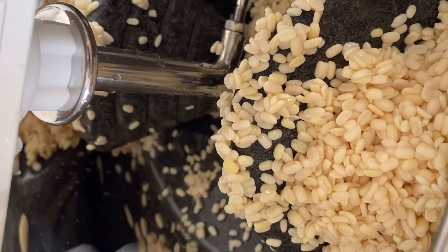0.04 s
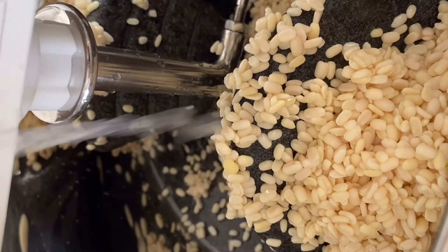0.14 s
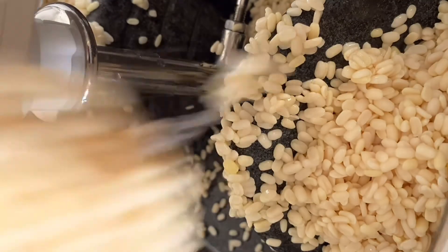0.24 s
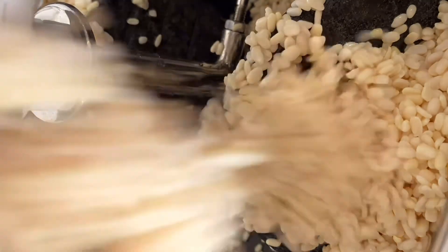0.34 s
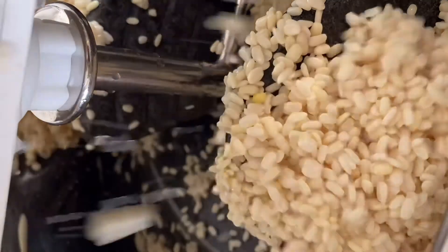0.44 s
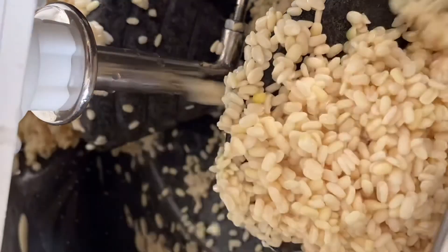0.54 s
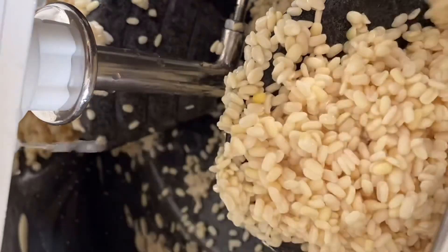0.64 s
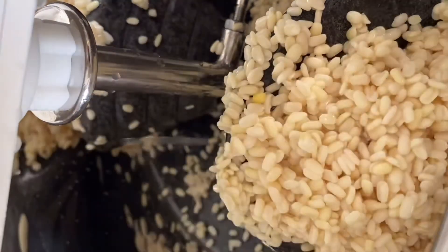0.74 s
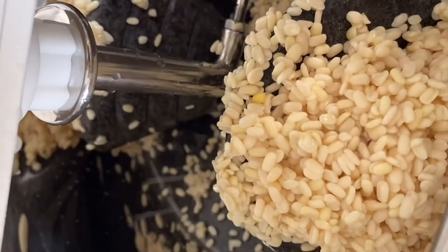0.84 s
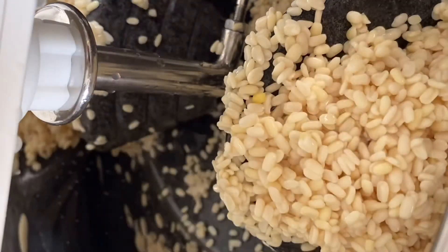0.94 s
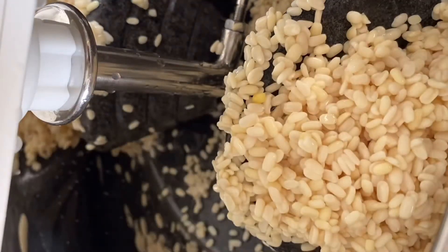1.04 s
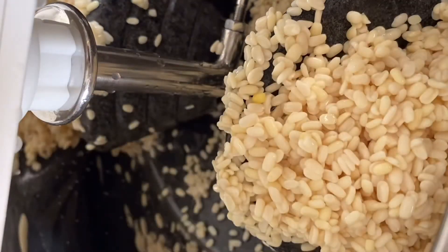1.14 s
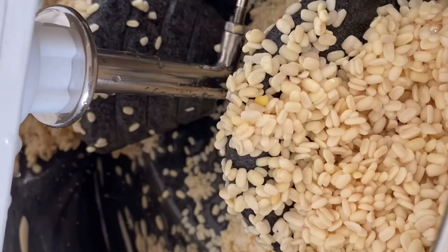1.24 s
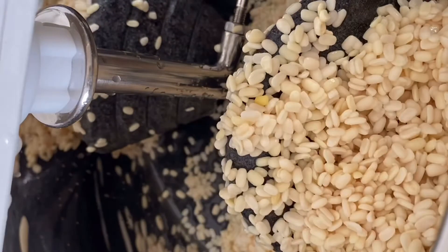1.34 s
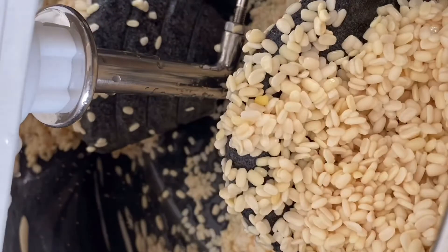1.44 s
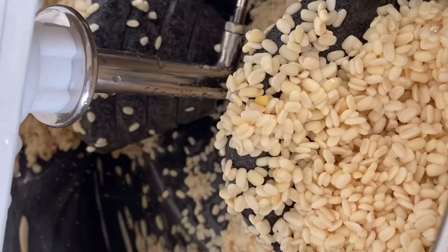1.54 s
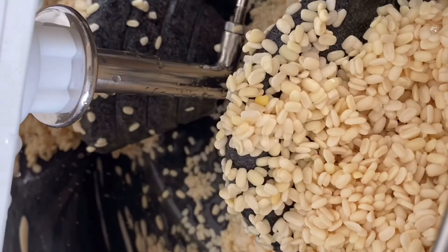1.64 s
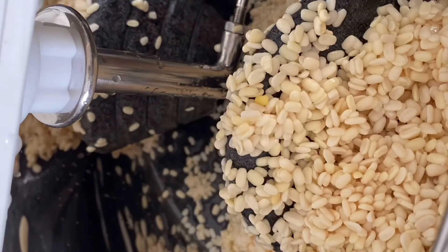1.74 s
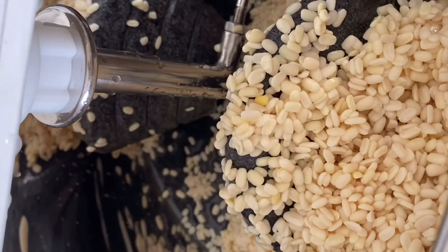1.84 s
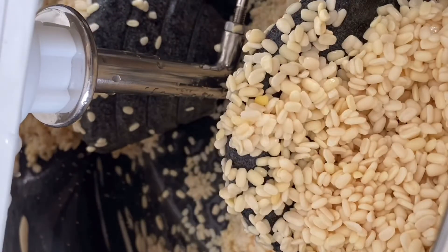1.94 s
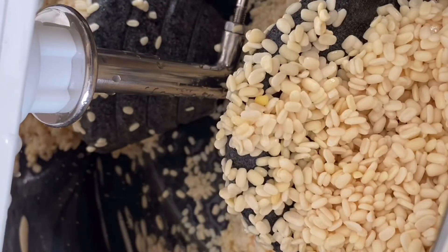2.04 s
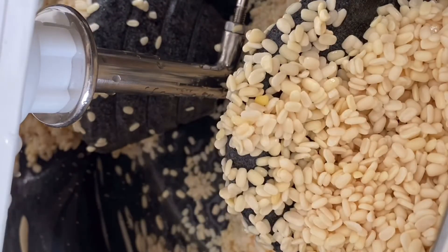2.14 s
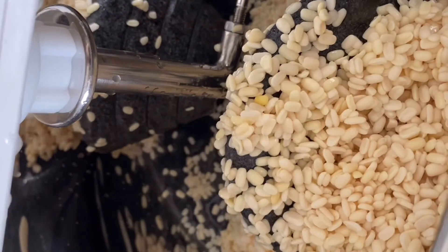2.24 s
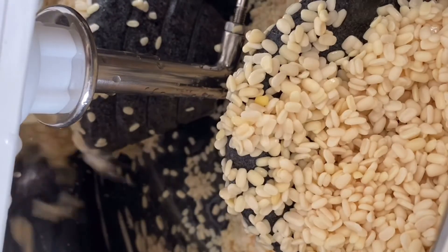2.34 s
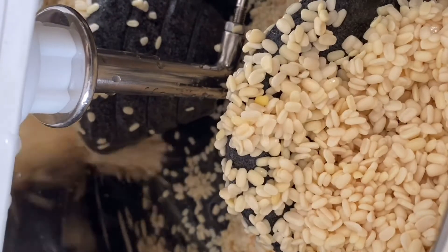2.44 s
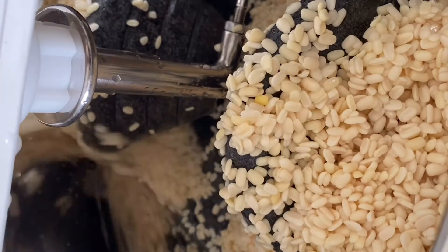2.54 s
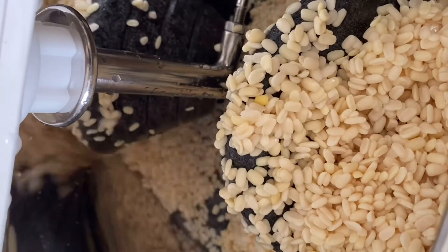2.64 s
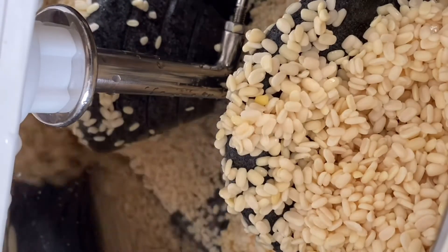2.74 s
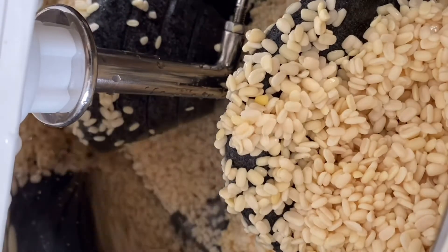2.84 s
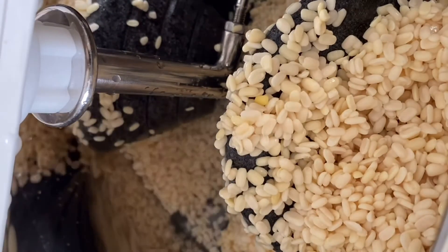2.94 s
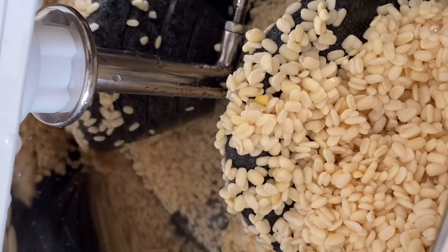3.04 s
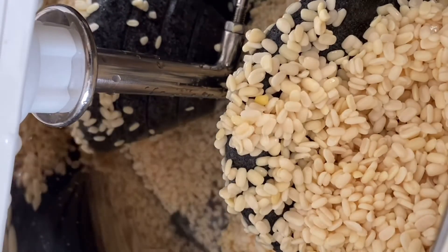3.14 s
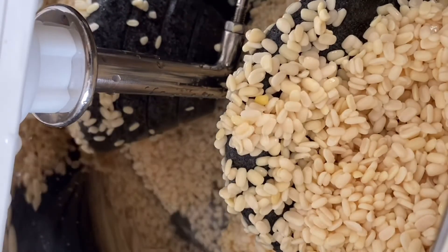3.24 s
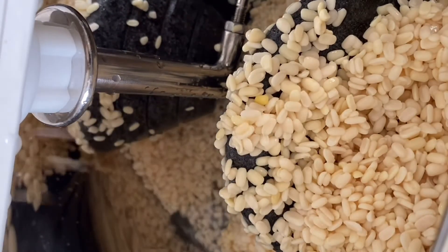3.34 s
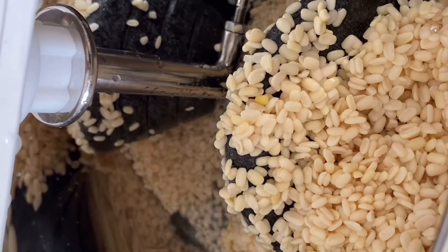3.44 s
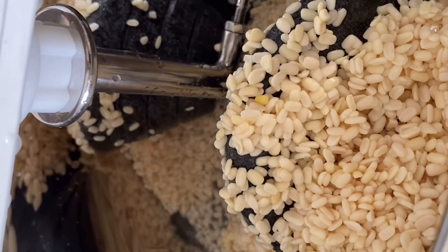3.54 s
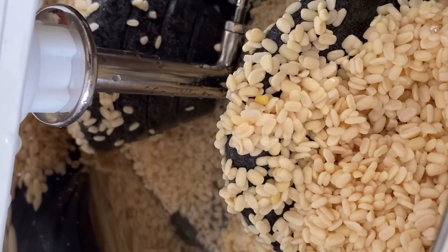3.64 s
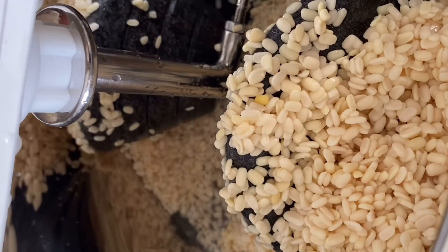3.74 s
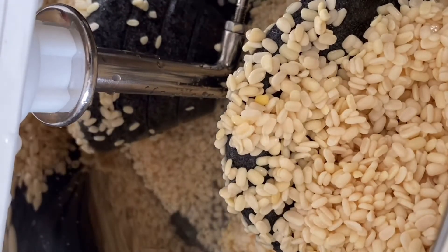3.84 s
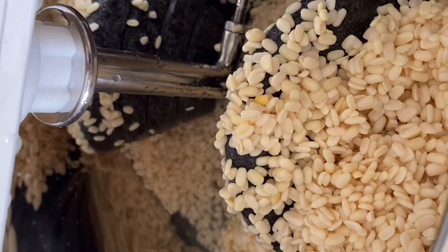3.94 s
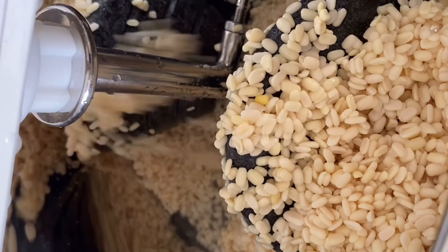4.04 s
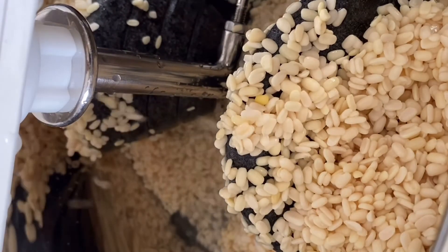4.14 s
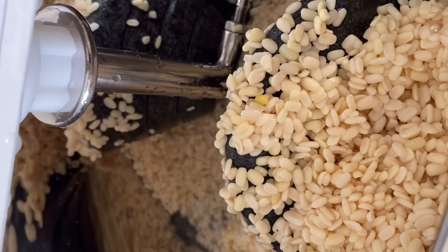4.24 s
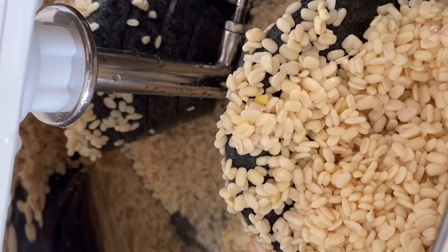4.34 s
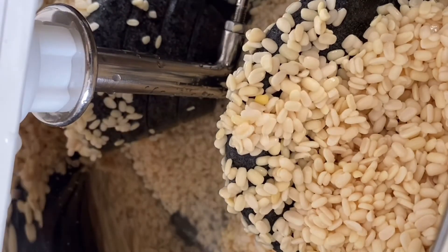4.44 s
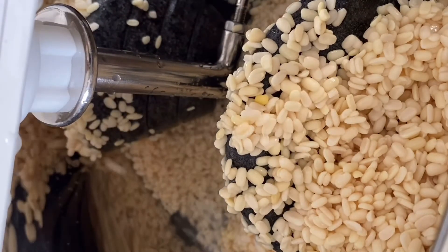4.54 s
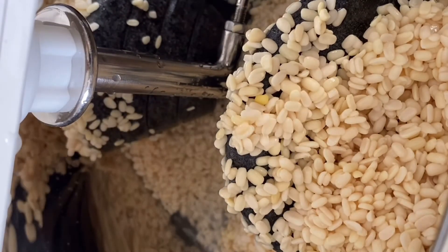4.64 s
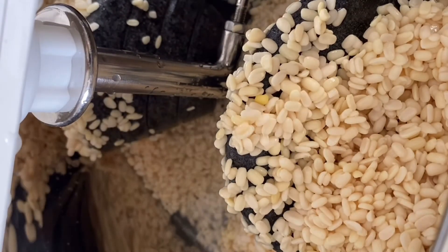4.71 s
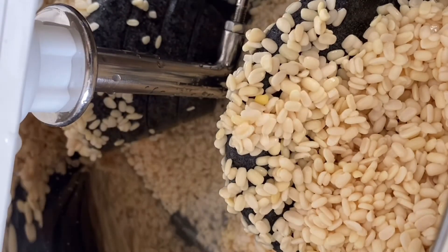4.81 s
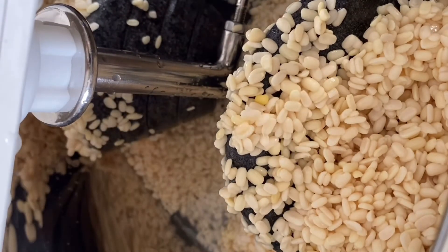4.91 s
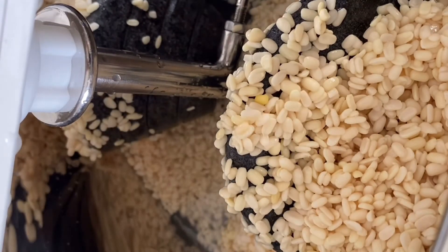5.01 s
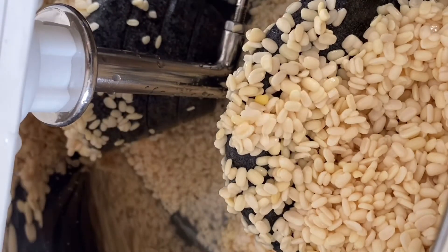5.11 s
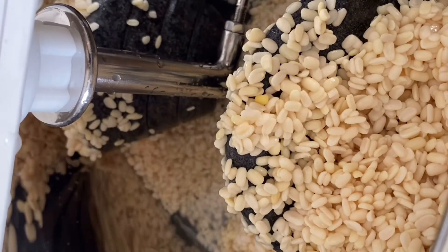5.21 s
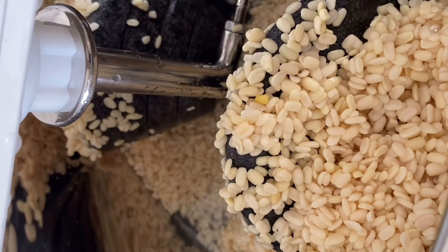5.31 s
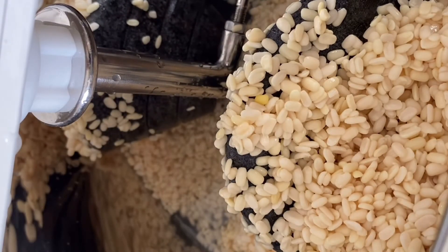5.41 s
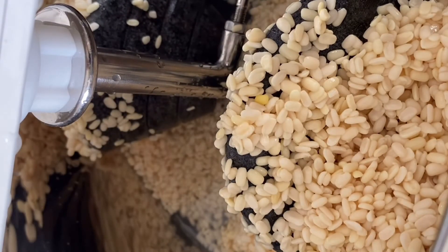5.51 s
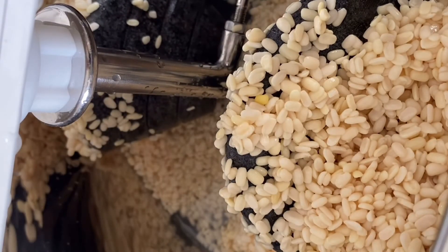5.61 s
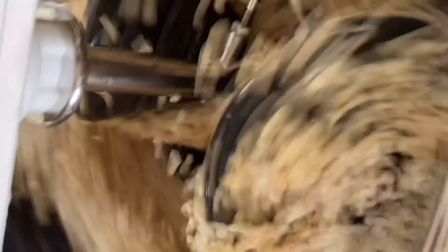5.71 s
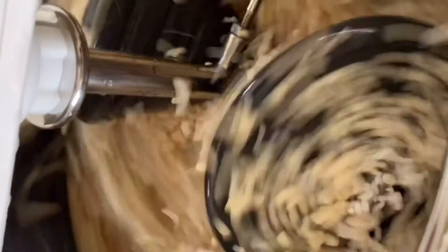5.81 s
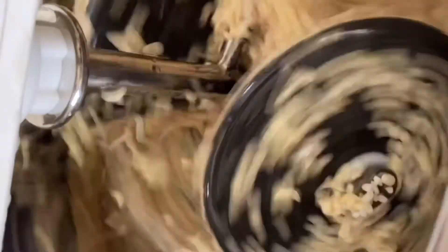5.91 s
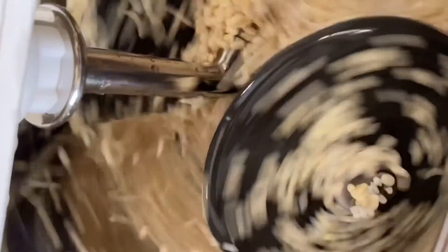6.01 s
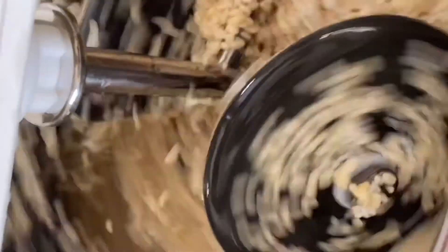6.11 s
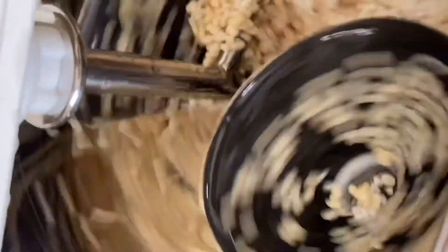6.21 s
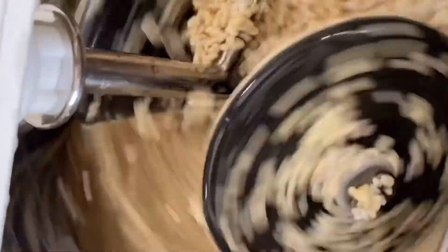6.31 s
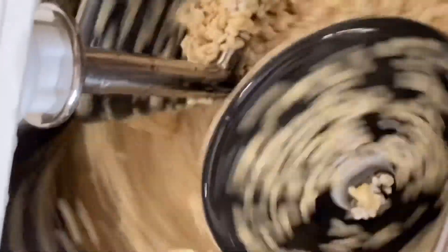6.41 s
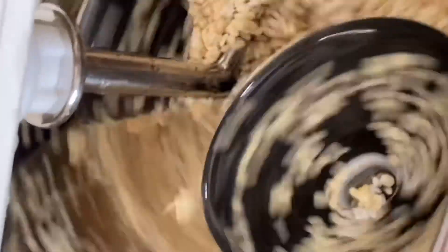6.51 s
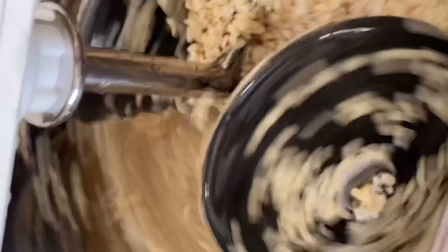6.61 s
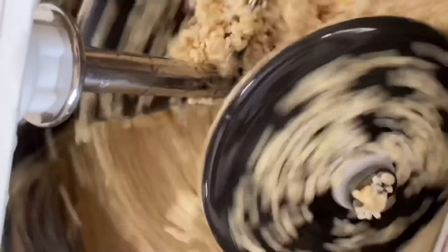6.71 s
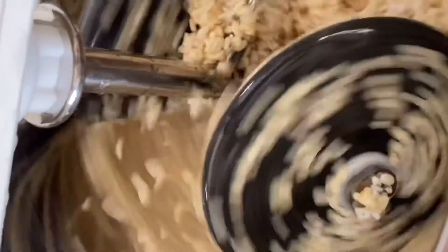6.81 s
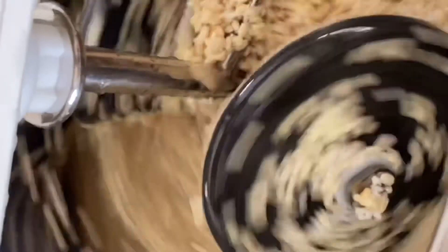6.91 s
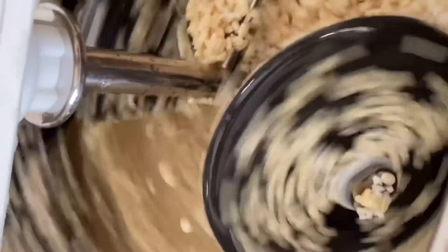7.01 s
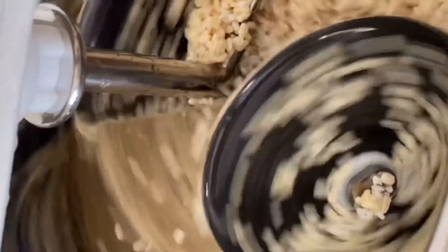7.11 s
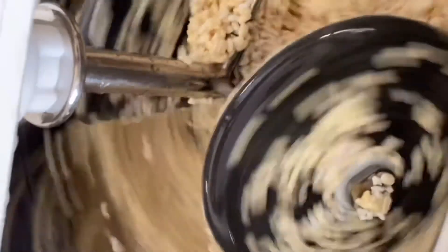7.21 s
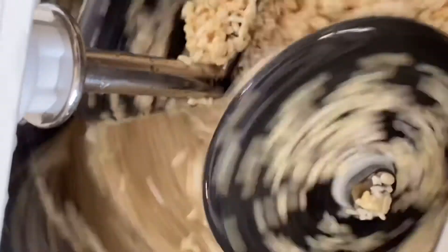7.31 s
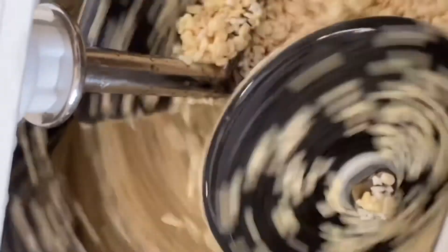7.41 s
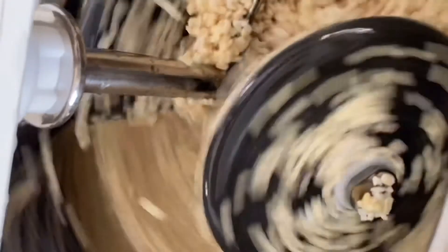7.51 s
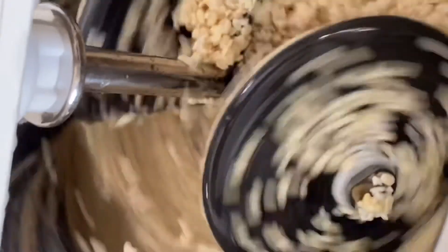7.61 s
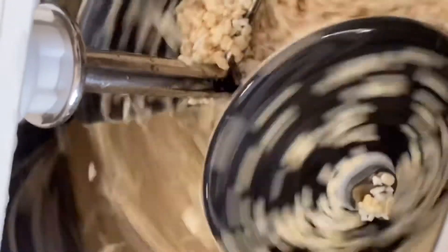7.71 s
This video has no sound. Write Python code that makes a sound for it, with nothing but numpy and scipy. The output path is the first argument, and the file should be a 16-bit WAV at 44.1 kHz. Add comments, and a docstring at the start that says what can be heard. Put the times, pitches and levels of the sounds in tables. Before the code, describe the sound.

Close up, small hard grains rattle briefly, then near silence with faint room tone. A steel bowl bangs and booms, drip-like blips sound, and wet grains are scraped and shaken out in uneven spurts, strongest about two thirds through the pouring. Then the machine is suddenly running: a clunk, a bright gritty onset, and continuous rumbling, crunching noise in a small indoor room.

```python
"""In a quiet kitchen wet lentils are tipped and scraped from a steel bowl into the drum of a stone grinder.
Grains are random clicks that ring damped modes, under a film of hissing noise; contacts set off ringing
modes, some as short drip-like blips, and the hollow bowl booms when knocked. Two cuts each fade briefly
down and up; the second goes to the grinder running: a hollow clunk of its drum, then dense crushing noise
through drum resonances, over motor tones."""
import sys
import numpy as np
from scipy import signal
from scipy.fft import rfft, irfft
from scipy.io import wavfile
from scipy.ndimage import uniform_filter1d

SR = 44100
rng = np.random.default_rng(int(sys.argv[2]) if len(sys.argv) > 2 else 0)


def unload_audio(sound):
    """Save the sound as a 16-bit wav file, at the path given as the first command line argument."""
    columns = np.transpose(np.atleast_2d(sound))
    # keep every value between -1 and 1, then stretch to whole-number steps
    steps = np.round(np.clip(columns, -1, 1) * 32767)
    wavfile.write(sys.argv[1], SR, steps.astype(np.int16))


N = 342216
TIME = np.arange(N) / SR
HZ = np.maximum(np.arange(N // 2 + 1) * SR / N, 1)

# ringing modes; 960 and 1276 Hz sound in short bubbly, drip-like blips:
# (frequency [Hz], level [dB], t60 [s])
RINGING_MODES = [(960, -6.5, 0.0415), (1178, -2, 0.167), (1276, -1, 0.054), (1599.8, -5.5, 0.263),
                 (1878, 2.5, 0.207), (2280, 0, 0.062), (2755, 0, 0.107), (4050, -6, 0.12),
                 (3444, 0.5, 0.198), (3708, -3, 0.116), (3198, -2.5, 0.313), (4830, -5.5, 0.093),
                 (5125, 0, 0.239), (5270, 3, 0.094), (5620, -11, 0.2), (5776, -5, 0.14)]
# two cuts, each a short fade down and up; the second goes to the grinder: (start [s], end [s], depth [dB])
CUTS = [(1.087, 1.087, -22), (5.605, 5.608, -38)]
GRINDER_START_S, LENTILS_END_S = CUTS[1][:2]


def amp(db):
    """Decibels to gain."""
    return 10 ** (np.asarray(db) / 20)


def unit(x):
    """Scale to rms 1."""
    return x / np.sqrt(np.mean(x ** 2) + 1e-20)


def curves(rows):
    """Columns of a table over time, one value per sample."""
    s, *columns = np.transpose(rows)
    return [np.interp(TIME, s, column) for column in columns]


def over_hz(points):
    """A table over frequency, read at every spectral bin on a log axis."""
    hz, value = np.transpose(points)
    return np.interp(np.log(HZ), np.log(hz), value)


def colour(x, db):
    """Filter by a dB value per spectral bin; rms 1."""
    return unit(irfft(rfft(x) * amp(db), N))


def drift(rate_hz):
    """Slow random wander of rms 1: noise through two equal poles at rate_hz, at 1/40 sample rate."""
    step = 40
    pole = np.exp(-2 * np.pi * rate_hz * step / SR)
    noise = rng.standard_normal(N // step + 2002)
    slow = signal.lfilter([1], [1, -2 * pole, pole * pole], noise)[2000:]
    return np.interp(np.arange(N) / step, np.arange(len(slow)), unit(slow))


def grains(per_s, spread_db, clump_db):
    """Random clicks of uneven size and either sign that come in clumps."""
    born = rng.random(N) < per_s * amp(clump_db * drift(25.0)) / SR
    size_db = spread_db * np.minimum(rng.exponential(1, N), 5)
    return born * amp(size_db) * rng.choice([-1, 1], N)


def ring(clicks, hz, t60):
    """One damped mode set going by clicks; rms 1."""
    radius, angle = amp(-60 / (t60 * SR)), 2 * np.pi * hz / SR
    poles = [1, -2 * radius * np.cos(angle), radius * radius]
    return unit(signal.lfilter([1, 0, -1], poles, clicks + 1e-18))


def add(out, s, sound):
    """Mix a short sound in at a time."""
    i = max(round(s * SR), 0)
    out[i:i + len(sound)] += sound[:N - i]


def fading(t60, rise_s):
    """Half-second time axis and envelope of a blow: quick rise, exponential decay."""
    t = np.arange(SR // 2) / SR
    rise = 1 - np.exp(-t / max(rise_s, 1e-5))
    return t, rise * amp(-60 * t / max(t60, .004))


def flow():
    """Rattle and hiss level in dB: pours, shakes and trickle add as powers."""
    # stray grains: (time [s], rattle [dB], wet hiss [dB])
    trickle = [(0, -57, -66.5), (.45, -60.5, -84.5), (1.0, -76, -67), (1.3, -71, -69), (1.9, -84.5, -89),
               (2.1, -54, -62), (2.85, -51.5, -58.5), (3.4, -55.5, -55.5), (3.47, -60, -73),
               (3.7, -57.5, -57), (4.3, -64.5, -68), (5.6, -54.5, -56)]
    # heaps sliding in, swelling and fading evenly:
    # (peak time [s], rattle [dB], wet hiss [dB], time to fall 20 dB either side [s])
    pours = [(0.263, -35, -58.5, 0.132), (.375, -43, -62, .05), (.81, -63, -76.5, 0.1956),
             (1.045, -52, -38, 0.03), (2.349, -39, -44, 0.124), (2.44, -42, -48, 0.2532),
             (3.851, -49, -58.5, 0.1981), (4.073, -58, -35, 0.0911), (4.56, -49, -52.5, 0.17),
             (5.053, -51, -43, 0.144), (5.457, -50, -38.5, 0.07), (2.959, -42, -38.5, 0.0459)]
    # grains shaken loose at a stroke, sudden then dying:
    # (start [s], rattle [dB], wet hiss [dB], time to fall 20 dB [s])
    shakes = [(0.015, -54.5, -58, 0.33), (.187, -38, -48.5, 0.1318), (0.461, -39, -74.5, 0.04),
              (1.46, -50.5, -61.5, 0.23), (1.901, -58, -77.5, 0.94), (1.998, -52.5, -40, 0.0138),
              (2.045, -40.5, -62, 0.246), (2.59, -48.5, -31.5, 0.0067), (2.677, -45, -43, 0.1233),
              (2.889, -39, -29.5, 0.221), (3.894, -33.5, -27, 0.0448), (3.992, -47.5, -33.5, 0.0347),
              (4.122, -28.5, -25.5, 0.0232), (4.145, -37.5, -28, 0.0619), (4.432, -26.5, -27, 0.0077),
              (4.889, -42.5, -48, 0.1044), (4.949, -60, -38.5, 0.2), ]
    shake_rise_s = 0.00164
    time = TIME[::16]
    power = amp(2 * np.array(curves(trickle)))[:, ::16]
    for s, *db, fall_s in pours:
        swell = amp(-40 * ((time - s) / fall_s) ** 2)
        power = power + amp(2 * np.array(db))[:, None] * swell
    for s, *db, fall_s in shakes:
        t = np.maximum(time - s, 0)
        burst = np.minimum(t / shake_rise_s, 1) ** 2 * amp(-40 * t / fall_s)
        power = power + amp(2 * np.array(db))[:, None] * burst
    return [np.interp(TIME, time, db) for db in 10 * np.log10(power)]


def lentils():
    """Each grain rings some cycles at its own pitch, others strike the damped steel; the water film hisses."""
    # relative spectra: (frequency [Hz], density [dB per Hz])
    rattle_spectrum = [(150, -41.5), (300, 1.5), (700, -13), (1280, -2), (2200, 2.5), (3400, -1.5),
                       (5300, -1), (7000, -6), (10000, -17.5), (16000, -41.5)]
    hiss_spectrum = [(3500, -24.5), (6000, -10.5), (7400, -1), (10500, -6), (13500, -9.5), (16500, -15)]
    rattle_db, hiss_db = flow()
    clicks = amp(rattle_db) * grains(3500.0, 2.4, 3.2)
    pitch_index = rng.integers(0, 22, N)
    loose = np.zeros(N)
    for k, hz in enumerate(np.geomspace(300, 9000, 22)):
        own_clicks = clicks * (pitch_index == k) * amp(4 * drift(12))
        loose += ring(own_clicks, hz, 40 / hz) * np.sqrt(hz)
    wall = np.zeros(N)
    for hz, db, t60 in RINGING_MODES[3:]:
        wall += amp(db) * ring(clicks * amp(4 * drift(8)), hz, .4 * t60)  # the damped steel
    rattle = colour(loose, over_hz(rattle_spectrum)) + amp(-7) * unit(wall)
    rattle_rms = np.sqrt(np.mean(amp(2 * rattle_db)))
    film = amp(3.59 * drift(50.0)) * unit(grains(5000.0, 1.54, 2.8))  # short bursts with gaps
    snaps = .35 * unit(grains(150, 2.5, 4))
    hiss = amp(hiss_db + 6) * colour(film + snaps, over_hz(hiss_spectrum))
    return (unit(rattle) * rattle_rms + hiss) * (TIME < LENTILS_END_S)


def ticks():
    """Sharp ticks of grains and spoon: a burst of noise round a pitch over a broad crack."""
    # (time [s], level before a 5 dB cut [dB], pitch [Hz], t60 [s])
    tick_rows = [(0.0159, -29.5, 4130, 0.068), (0.1182, -26.5, 3350, 0.0205), (.16, -35.5, 2800, 0.0193),
                 (0.1902, -20.5, 2380, 0.0372), (.257, -23, 3580, 0.0575), (0.303, -27, 4330, 0.034),
                 (.324, -27, 5000, 0.037), (0.537, -34.5, 4590, 0.0253), (1.4562, -44, 1350, 0.068),
                 (1.9022, -39, 1530, 0.071), (2.047, -8, 1116, 0.044), (2.318, -22.5, 6600, 0.025),
                 (2.3403, -20.5, 5370, 0.0186), (2.352, -19, 5130, 0.017), (2.4, -24.5, 2070, 0.0225),
                 (2.4239, -26, 4220, 0.0212), (2.548, -30, 5660, 0.0288), (2.592, -21, 8640, 0.039),
                 (2.6762, -24, 3810, 0.0168), (2.8912, -20, 10500, 0.021), (3.1023, -25.5, 3780, 0.018),
                 (3.194, -27.5, 9460, 0.0225), (3.223, -29, 8800, 0.0343), (3.272, -33, 3430, 0.03),
                 (3.313, -28.5, 10000, 0.0205), (3.354, -31, 9000, 0.028), (3.451, -34, 5500, 0.0137),
                 (3.5, -34, 9200, 0.0396), (3.605, -24.5, 4690, 0.0268), (3.637, -24, 9600, 0.056),
                 (3.826, -25.5, 8840, 0.034), (3.897, -13.5, 4650, 0.0238), (3.9921, -21.5, 9050, 0.0286),
                 (4.059, -17.5, 9300, 0.026), (4.121, -14.5, 1740, 0.021), (4.1489, -13.5, 4960, 0.024),
                 (4.341, -33, 10100, 0.041), (4.4039, -27.5, 2840, 0.061), (4.4333, -15, 8700, 0.0243),
                 (4.5153, -22.5, 8940, 0.0143), (4.5506, -24, 9460, 0.021), (4.562, -34, 2280, 0.042),
                 (4.825, -40, 3640, 0.026), (4.864, -36, 2180, 0.031), (4.9502, -23, 8800, 0.0356),
                 (5.061, -27.5, 5300, 0.026), (5.219, -25.5, 9260, 0.0513), (5.317, -23.5, 1840, 0.0117),
                 (5.4316, -21, 9400, 0.025), (5.459, -29, 3620, 0.036)]
    out = np.zeros(N)
    for s, db, hz, t60 in tick_rows:
        env = fading(t60, 0.000237)[1][:SR // 10]
        noise = rng.standard_normal(len(env))
        band_filter = signal.butter(1, [hz / 1.115, hz * 1.228], "band", fs=SR, output="sos")
        band = signal.sosfilt(band_filter, noise)
        add(out, s, amp(db - 5) * env * (unit(band) + 0.21 * noise))
    return out


def rings_and_blips():
    """Each event excites mode clusters unevenly, which then die; modes far from its pitch are weak."""
    # steel rings favouring modes near one pitch; those at 2.368 and 2.434 s are bubbly, drip-like blips:
    # (time [s], level [dB], favoured pitch [Hz], rattling time [s], loss away from it [dB per octave])
    events = [(.324, -47, 4830, 0.04, 60), (1.133, -59, 4600, 0.063, 16), (2.001, -49, 4840, 0.0077, 42),
              (2.288, -47, 2240, 0.117, 19.5), (2.368, -28.5, 1276, 0.0036, 90),
              (2.434, -28.5, 960, 0.0038, 76), (2.62, -43, 2280, 0.0082, 41.5),
              (2.893, -38, 3360, 0.0746, 2.5), (3.0, -44.5, 3444, 0.044, 90.5),
              (3.897, -30, 3658, 0.0098, 104.5), (4.147, -35, 4490, 0.015, 5),
              (4.168, -40.5, 3198, 0.014, 13.5), (4.436, -45.5, 2230, 0.01, 10.5),
              (4.565, -55, 1879, 0.033, 30.5), (4.891, -48, 2100, 0.033, 19),
              (5.121, -52.5, 1890, 0.096, 38.5), (5.315, -46.5, 1850, 0.036, 43),
              (5.501, -54, 1879, 0.027, 42.5)]
    split_share, spot_db = .022, 4  # spread of a cluster; its strength differs by event
    rough_rad = 0.04  # random phase step per sample while rattling, scaled by loose
    out = np.zeros(N)
    shake_db = [2.86 * drift(30.0) for mode in RINGING_MODES]
    t = np.arange(SR // 3) / SR
    for s, db, favoured_hz, rattling_s, loss_db in events:
        i = round(s * SR)
        loose = 1 / (1 + loss_db / 10)  # a choosy event rings cleaner
        for (hz, mode_db, t60), uneven_db in zip(RINGING_MODES, shake_db):
            near_db = -loss_db * abs(np.log2(hz / favoured_hz))
            if near_db < -30:
                continue
            apart, spot = rng.standard_normal((2, 2, 1))
            decay = amp(-60 * np.maximum(t - rattling_s, 0) / t60)
            env = (1 - np.exp(-t / 0.00087)) * decay * amp(loose * uneven_db[i:i + len(t)])
            slip_rad = np.cumsum(rng.standard_normal(len(t)) * (t < rattling_s)) * rough_rad * loose
            main = np.sin(2 * np.pi * hz * t + slip_rad)
            beside_hz = hz * (1 + split_share * apart)
            beside_gain = amp(spot_db * (spot - 1.5) - loss_db / 5)
            beside = beside_gain * np.sin(2 * np.pi * beside_hz * t - slip_rad)
            add(out, s, amp(db + mode_db + near_db) * env * (main + beside.sum(axis=0)))
    return out


def hollow_knocks():
    """Knocks of bowl, and last of drum, swell, wobble and die over a dull puff; the handled bowl hums."""
    # soft knocks in the bowl, stilled by the hand, some quickly and some slowly; the last is a hollow clunk of
    # the drum: # (time [s], level [dB], time until 60 dB down, sign ignored [s])
    knocks = [(0.191, -40, 0.19), (2.046, -10.5, 0.08), (2.696, -29.5, 0.26), (2.898, -29, 0.24),
              (2.943, -30.5, 0.3), (3.072, -33, -1.2), (3.098, -21, .055), (3.156, -29.5, -0.77),
              (3.196, -38, 0.46), (3.606, -22.5, 0.21), (3.898, -21, 0.23), (3.961, -34.5, -0.3),
              (4.055, -35, 0.36), (4.121, -29, 0.35), (4.16, -33, 0.6), (4.416, -23, 0.26),
              (4.435, -20, -0.3), (4.888, -36.5, 0.28), (4.958, -43.5, 0.55), (5.315, -28.5, -0.29),
              (5.37, -29, 0.04), (5.655, -19.5, -2.08)]
    # hollow resonances: (frequency [Hz], level [dB])
    hollow = [(376, 3), (397, -7), (610, -13.5)]
    # hum while the bowl is handled: (time [s], level [dB])
    handling = [(0.0, -92), (3.15, -55.5), (5.01, -66), (5.6, -61)]
    puff_db, uneven_db, waver_rad = -16, 1.2, .012  # contact noise; wobble of level and phase
    tail_db, tail_t60_s = -21, 0.361  # rings on after a knock is stilled
    main_hz = hollow[0][0]

    hum_shape_db = -10 * np.log10(1 + ((HZ - main_hz) / 22) ** 4)
    hum = colour(rng.standard_normal(N), hum_shape_db)
    hum = hum * amp(curves(handling)[0] + 5 * drift(15)) * (TIME < LENTILS_END_S)

    puff_filter = signal.butter(2, [270, 760], "band", fs=SR, output="sos")
    puff = unit(signal.sosfilt(puff_filter, rng.standard_normal(N)))
    tone = np.zeros(N)
    for hz, db in hollow:
        slip_rad = np.cumsum(rng.standard_normal(N)) * waver_rad * hz / main_hz
        tone += amp(db + uneven_db * drift(9.6)) * np.sin(2 * np.pi * hz * TIME + slip_rad)

    strength = np.zeros(N)
    t, env = fading(0.1746, 0.00577)
    tail = amp(tail_db) * fading(tail_t60_s, 0.0596)[1]
    for s, db, damped_s in knocks:
        stilled = amp(-60 * (t / damped_s) ** 2)
        add(strength, s, amp(db) * (env * stilled + tail))
    return hum + strength * (tone + amp(puff_db) * puff) * amp(uneven_db * drift(33.9))


def thuds():
    """The bowl is set down or bumps the drum: dull noise that dies, the lows last."""
    # (time [s], level [dB], t60 of the lows [s])
    thud_rows = [(1.462, -46, 1), (2.05, -21.5, 0.508), (3.604, -28.5, 0.441), ]
    # relative spectrum: (frequency [Hz], density [dB per Hz])
    thud_spectrum = [(30, -30.5), (60, -6.5), (92, -3.5), (200, -6.5), (376, -8), (720, -16.5),
                     (1200, -17.5), (3000, -31), (6000, -41)]
    out = np.zeros(N)
    rumble = colour(rng.standard_normal(N), over_hz(thud_spectrum))
    deep = signal.sosfilt(signal.butter(2, 200, fs=SR, output="sos"), rumble)
    for s, db, t60 in thud_rows:
        i = round(s * SR)
        t, long = fading(t60, 0.0018)
        short = fading(t60 * 0.388, 0.00212)[1]
        part = slice(i, i + len(t))
        add(out, s, amp(db) * (long * deep[part] + short * (rumble - deep)[part] * 1.15))
    return out


def grinder():
    """Dense crushing shakes the drum's resonances; octaves flicker partly in step as the stones roll."""
    # relative crushing spectrum: (frequency [Hz], density [dB per Hz])
    stones = [(25, -46.5), (45, -7), (90, -4), (160, -10), (517, -10), (661, -19.5), (1600, -16),
              (2140, -15), (3500, -15), (5600, -12.5), (7400, -18), (10500, -20), (13600, -23.5),
              (15800, -26), (17000, -59)]
    # drum resonances: (frequency [Hz], width [Hz], lift [dB])
    drum = [(62.4, 12.7, 3), (87.4, 19.4, 4.5), (215.64, 10.7, 7), (408.8, 69.5, 5.5), (733.8, 63.6, 9),
            (855.2, 75.7, 11), (1104, 91, 7), (2100, 370, 4.5)]
    # steady motor tones, most on multiples of twice the mains frequency: (frequency [Hz], rms level [dB])
    motor = [(100, -34), (300, -43), (500, -43), (524.5, -40)]
    running_db, bright_db = -22, -12  # treble tilt: half in the 4 kHz octave, full from 8 kHz
    first_bite_db, first_bite_s = 1.5, 0.033  # louder as the stones first bite
    whole_grains_db, whole_grains_s = 8.5, 0.269  # brighter until the whole grains are broken
    churn_db, churn_s = 3.5, 1.0  # the 2 kHz churning eases as the heap thins
    lumps_db, lumps_hz = 1.6, 25.0  # the stones bump over heaps, felt in the bass

    since_s = np.maximum(TIME - LENTILS_END_S, 0)
    level_db = running_db + first_bite_db * np.exp(-since_s / first_bite_s)
    tilt_db = bright_db + whole_grains_db * np.exp(-since_s / whole_grains_s)
    churning_db = churn_db * np.exp(-since_s / churn_s)
    lift_db = sum(db / (1 + (2 * (HZ - hz) / width) ** 2) for hz, width, db in drum)
    source = unit(grains(12000.0, 1.845, 0.99)) + 0.678 * rng.standard_normal(N)
    crush = rfft(source) * amp(over_hz(stones) + lift_db)

    rolling, bumps_db = drift(4.4), lumps_db * drift(lumps_hz)
    octave_position = np.log2(np.clip(HZ, 31.25, 16000) / 31.25)
    crushing = np.zeros(N)
    for octave in range(10):
        share = np.clip(1 - abs(octave_position - octave), 0, 1)
        gain_db = 0.5 * rolling + .9 * drift(22.9) + bumps_db * (octave < 3)
        gain_db = gain_db + tilt_db * np.clip(octave - 6, 0, 2) / 2 + churning_db * (octave == 6)
        crushing += amp(gain_db) * irfft(crush * share, N)
    hum = sum(np.sqrt(2) * amp(db) * np.sin(2 * np.pi * (hz * TIME + rng.random())) for hz, db in motor)
    return (amp(level_db) * unit(crushing) + hum) * (TIME > GRINDER_START_S)


def room():
    """Room tone: coloured noise of wandering level, which also changes about the cuts."""
    # (time [s], level [dB])
    ambience = [(0, -70.5), (.4, -59.5), (.6, -73), (1.07, -70.5), (1.12, -58.5), (2.2, -58.5),
                (5.55, -65.5)]
    # relative spectrum: (frequency [Hz], density [dB per Hz])
    room_spectrum = [(20, -19.5), (45, -0.5), (195, -8.5), (575, -20.5), (1260, -24.5), (2500, -30),
                     (6000, -36.5), (16000, -42.5)]
    level_db = curves(ambience)[0] + 3.13 * drift(2.37)
    return amp(level_db) * colour(rng.standard_normal(N), over_hz(room_spectrum))


def dips(rows):
    """Gain with flat-bottomed notches."""
    return amp(sum(db * np.exp(-(2 * (HZ - hz) / width) ** 6) for hz, width, db in rows))


def microphones(x):
    """The direct sound leans and lags per band; short scattered echoes reach the two ports unlike."""
    # (frequency [Hz], left-right likeness [0-1])
    likeness = [(60, 1), (250, 1), (640, 0.768), (1700, 0.263), (3100, 0.854), (5000, 0.858), (8000, 1),
                (15000, 1)]
    # (frequency [Hz], left minus right [dB])
    lean = [(60, 0), (380, -2), (950, -1.88), (6000, -0.08)]
    # odd leads cancel in the centre, even ones at the sides: (frequency [Hz], lead of left [half turns])
    lead = [(60, .01), (600, .1), (1800, .01), (3200, .15), (5000, .05), (7400, 1.0), (10600, 2.0),
            (13600, 3.0), (16500, 4.0)]
    # where the ports nearly cancel, the weak rest fades further: (frequency [Hz], width [Hz], gain [dB])
    centre_dips = [(7343, 1370, -9.5), (13660, 1360, -38)]
    side_dips = [(1790, 1042, -26), (10900, 1150, -33.5)]
    t, env = fading(0.0384, 0.0014)
    scatter = rfft(env * rng.standard_normal(len(t)), N)
    scatter /= np.sqrt(uniform_filter1d(abs(scatter) ** 2, size=401))  # even out the spectrum
    alike = np.clip(over_hz(likeness), 0, 1)
    half = amp(over_hz(lean) / 2) * np.exp(.5j * np.pi * over_hz(lead))
    spectrum = rfft(x)
    direct = spectrum * np.sqrt((1 + alike) / 2)
    apart = spectrum * scatter * np.sqrt((1 - alike) / 2)
    left, right = direct * half + apart, direct / half - apart
    centre = (left + right) / 2 * dips(centre_dips)
    side = (left - right) / 2 * dips(side_dips)
    return irfft([centre + side, centre - side], N)


def scene():
    """All sources, heard through the pair of ports."""
    pouring = lentils() + ticks() + rings_and_blips() + hollow_knocks() + thuds()
    return microphones(pouring + grinder() + room())


def record(dry):
    """Each cut between shots fades briefly down and up, then the top is filtered off."""
    cutoff_hz = 16500
    gain_db = np.zeros(N)
    for start_s, end_s, db in CUTS:
        corners_s = [start_s - .012, start_s, end_s - .004, end_s + 0.0062]
        gain_db += np.interp(TIME, corners_s, [0, db, db, 0])
    top_cut = signal.cheby2(16, 70, cutoff_hz, fs=SR, output="sos")
    return signal.sosfilt(top_cut, dry * amp(gain_db))


dry = scene()
out = record(dry)
unload_audio(out)
```